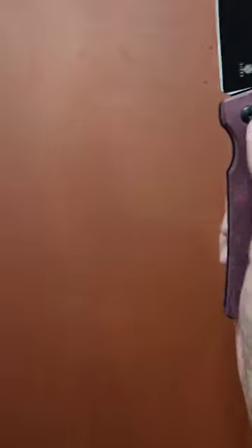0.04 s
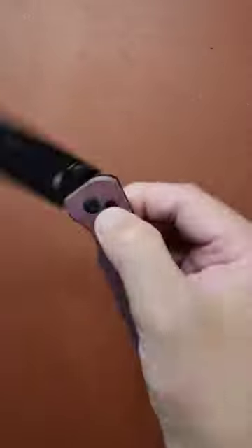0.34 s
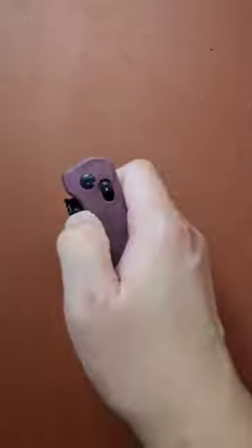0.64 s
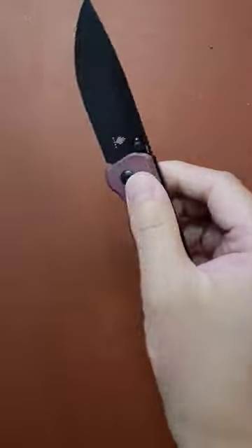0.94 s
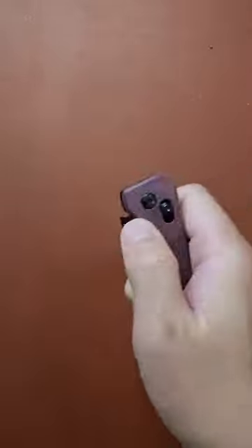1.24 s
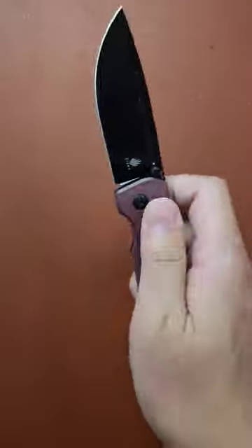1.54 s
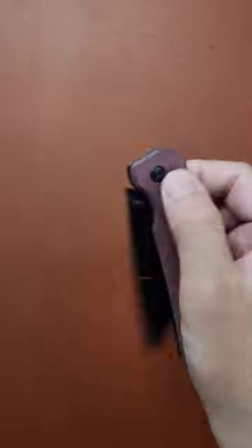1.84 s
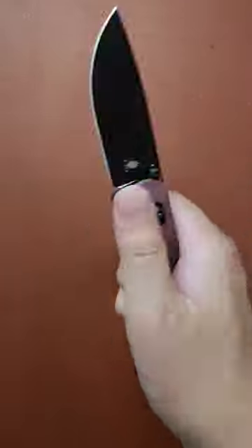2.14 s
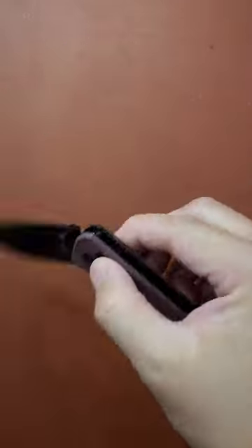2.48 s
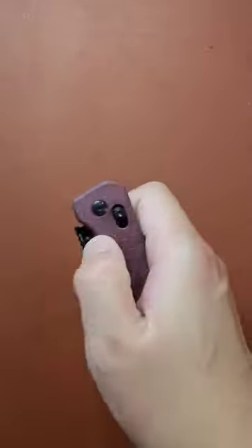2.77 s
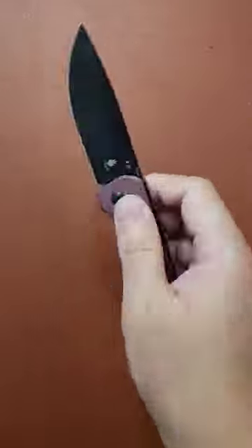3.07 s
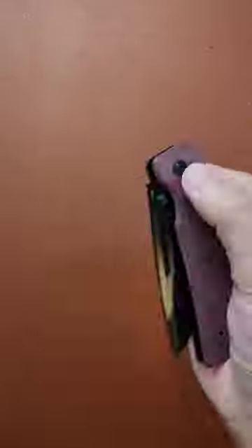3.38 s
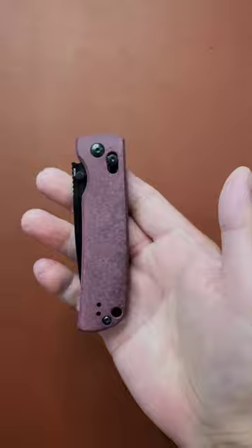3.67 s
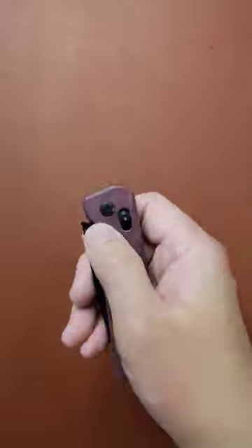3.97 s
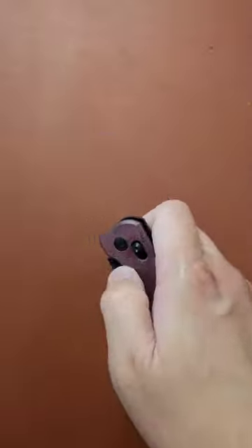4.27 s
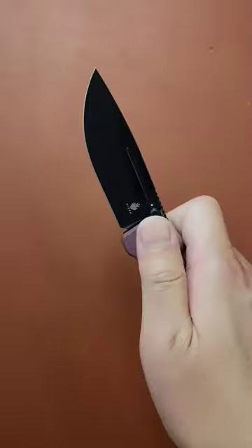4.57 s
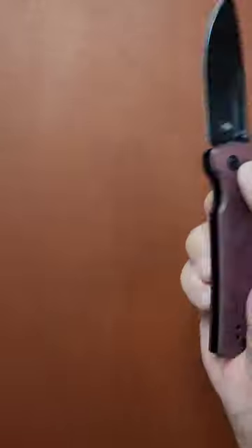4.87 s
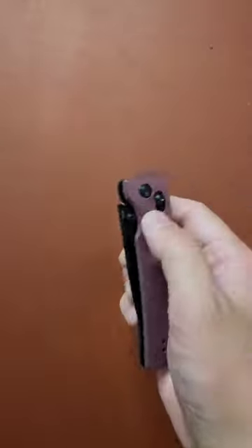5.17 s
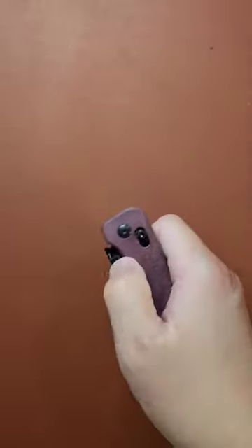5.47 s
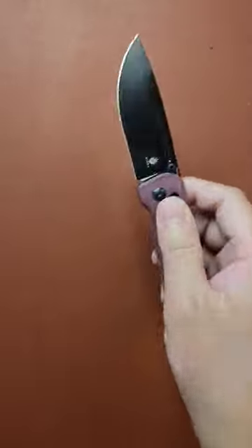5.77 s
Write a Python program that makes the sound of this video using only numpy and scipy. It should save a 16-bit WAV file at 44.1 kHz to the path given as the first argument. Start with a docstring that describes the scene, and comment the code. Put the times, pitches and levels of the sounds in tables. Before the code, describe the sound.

Close up in a small, dry room, a pocket knife clacks shut, then snaps open with a short steel ring. The pair repeats six times in all, with slightly longer gaps in the second half. Small lock and pivot ticks fall between the main clicks, and each snap carries a very short burst of hiss. Behind it all runs the soft, low hum of a fan.

```python
"""Playing with a folding knife

A knife is shut and flicked open six times, close to the microphone in a small, dry room.
The lock bar ticks. The blade drops into the handle with a clack, or swishes round its pivot,
snaps against its stop and rings. Each snap sits in a short swell of hiss, and fainter swells
come in between. A fan hums steadily underneath."""
import sys
import numpy as np
from scipy import signal
from scipy.fft import rfft, irfft
from scipy.io import wavfile
from scipy.ndimage import map_coordinates

SR = 44100
rng = np.random.default_rng(int(sys.argv[2]) if len(sys.argv) > 2 else 0)


def dump(signal):
    """Clip the signal to [-1, 1] and save it as 16-bit WAV at the path in sys.argv[1]."""
    limited = np.clip(np.atleast_2d(signal).T, -1, 1)
    pcm = np.round(limited * 32767).astype(np.int16)
    wavfile.write(sys.argv[1], SR, pcm)


N = 265482

# A noise's colour says how strong its low and high parts are against each other: f/Hz, level/dB
FAN_COLOUR = [(15, -19), (35, -16.5), (70, -6.5), (125, -1), (190, -3), (240, -5.5), (275, -16),
              (315, -10.5), (370, -21), (470, -27), (680, -23), (830, -23.5), (1150, -28.5), (1500, -31.5),
              (2500, -41.5), (4000, -52), (8000, -69.5)]
STEADY_HISS_COLOUR = [(1000, -1.5), (4000, -1), (9000, -6), (15000, -9)]
RUMBLE_COLOUR = [(15, -8.5), (35, -6.5), (70, -3.5), (130, 0), (280, -13), (450, -30), (1500, -50),
                 (4000, -88)]
SOFT_HISS_COLOUR = [(1200, -18.5), (2500, -6), (5000, 0), (8000, -2), (15000, -10)]
# the fan's tones: f/Hz, level/dB, wavering rate/Hz
FAN_TONES = [(132.9, -63.5, 7.1), (167.9, -58.5, 4.2), (227.7, -64, 5), (590, -87.5, 1.5), (888, -86, 6),
             (1075, -79, 2.7)]
# how the rumble dies away: t/s, level/dB
RUMBLE_FADE = [(0, -51), (.15, -50), (.4, -50.5), (.62, -48), (.72, -51.5), (.85, -70), (6.02, -70.5)]
# how alike the background is on the left and right: f/Hz, likeness (1 = the same)
ROOM_LIKENESS = [(60, 0.75), (150, 0.65), (380, 0.42), (950, -0.16), (2380, -0.25), (5980, -0.2),
                 (15000, 0.03)]
# faint swells of hiss between the clicks: t/s, level/dB, half width/s
HISS_SWELLS = [(0.136, -75, .025), (.245, -62.5, 0.018), (.303, -57, 0.022), (0.381, -65.5, 0.075),
               (.932, -61.5, 0.0087), (.999, -67.5, 0.034), (1.3, -64, 0.023), (2.599, -70, 0.018),
               (4.035, -65.5, 0.016), (4.098, -64, 0.035), (4.153, -63, .01), (4.216, -65, .015),
               (4.37, -79.5, .023), (5.421, -75.5, 0.058), (5.941, -69, 0.015)]
# the colour of each knife part, by name: f/Hz, level/dB
PART_COLOURS = {"open": [(260, -45), (450, -37), (882, -19.5), (1400, -31.5), (1850, -19), (3500, -10.5),
                (4000, -11.5), (4560, -8.5), (5600, -12.5), (7400, -3), (8400, -6), (9200, -10.5),
                (14800, -15), (16000, -37.5)], "shut": [(260, -48.5), (500, -29), (882, -16.5),
                (1300, -27.5), (2500, -8.5), (3500, -13), (4400, -4), (6150, -5.5), (7360, -6),
                (11000, -7.5), (13200, -4), (15300, -9), (16000, -20.5)], "lock": [(400, -35.5), (900, -23),
                (1700, -23), (2600, -17), (3700, -13.5), (4600, 3.5), (5750, -2.5), (7310, -4.5),
                (8450, -5), (9880, -7), (13400, -7), (15200, -14), (16000, -20)], "pivot": [(710, -37),
                (1500, -19.5), (2100, -9), (2790, 2.5), (3870, 0.5), (5020, -2), (6500, -10), (7410, -7.5),
                (9000, -9), (14000, -15.5), (16000, -30)], "stud": [(1200, -24), (2400, -22.5), (2900, 5.5),
                (3500, -19), (4600, -12.5), (7000, -22.5), (15000, -32.5)]}
# pitches that the handle boosts or weakens: f/Hz, width/Hz, lift/dB
HANDLE_RESONANCES = [(859.7, 65, 5), (1820, 130, 1), (2460, 840, 3), (3740, 930, -2.5), (5660, 710, 2),
                     (7370, 510, 5.5), (9100, 190, 1.5), (11370, 510, -7.5), (11600, 1100, 4.5),
                     (13400, 850, 3.5), (14500, 400, -4.5), (14750, 880, 6.5)]
# how each part answers a hit: time to fade by 60 dB/s, tilt/(dB per octave; more is brighter)
PART_RESPONSES = {"open": (.013, 0), "shut": (.014, 0.26), "lock": (0.013, -0.59), "pivot": (0.02, 0),
                  "stud": (.017, 1.5)}
# small ticks of the mechanism: t/s, level/dB, part
MECHANISM_TICKS = [(0.2319, -40, "lock"), (0.3314, -35.5, "lock"), (.423, -18.5, "lock"),
                   (.681, -60.5, "lock"), (0.752, -56.5, "pivot"), (0.787, -30, "lock"),
                   (1.414, -56.5, "stud"), (1.465, -54, "stud"), (1.8603, -25.5, "lock"),
                   (1.9351, -35, "lock"), (2.5731, -43.5, "lock"), (2.8784, -57.5, "stud"),
                   (2.9217, -59.5, "stud"), (2.972, -49, "stud"), (3.382, -45, "lock"),
                   (3.444, -51, "lock"), (4.0696, -50, "lock"), (5.0715, -40.5, "lock"),
                   (5.087, -43.5, "lock"), (5.328, -64, "stud"), (5.523, -63, "pivot"),
                   (5.608, -52, "pivot"), (5.634, -33, "pivot")]
# short swells of hiss around the lock's tick and the closing clack: main swell t/s, its level/dB,
# ring level/dB, early swell ahead by/s, its level/dB, lock swell ahead by/s, its level/dB,
# trailing hiss level/dB
CLOSING_SWELLS = [(.502, -28.5, -31, 0.029, -39, .072, -40, -64.5),
                  (1.231, -28.5, -49.5, .011, -30, 0.089, -34.5, -88),
                  (1.965, -28.5, -43.5, 0.031, -46.5, .106, -40, -74),
                  (2.644, -32.5, -44.5, 0.0065, -28, .11, -43, -63.5),
                  (3.503, -37.5, -49.5, 0.027, -30.5, 0.13, -50.5, -64),
                  (5.165, -30, -46, 0.026, -37, 0.1, -41.5, -76)]
# the closing blade hits and bounces: t/s, level/dB, left over right/dB, tilt/(dB per octave)
BLADE_CLACKS = [(0.4774, -8, 1.5, 1), (.5001, -18, 1, -1.5), (.5119, -25.5, 7, -2.5),
                (.5205, -30, 3.5, 3.5), (1.218, -23.5, 9, 10), (1.9644, -23, 13, 10),
                (1.974, -17.5, -1, 10), (2.6665, -23, 0, 1), (3.4668, -32, 0, 1.5), (3.476, -19.5, 1, 0),
                (3.4815, -26, 2, -2), (3.5067, -20.5, -0.5, 1.5), (5.1507, -14, -0.5, 0.5)]
# the blade flicks open: t/s at the stop, snap level/dB, left over right/dB, swell level/dB,
# ring level/dB, tilt/(dB per octave), swish ahead by/s, swish level/dB, trailing hiss level/dB
OPENINGS = [(0.8083, -23.5, -1, -24, -31.5, 0, .021, -42.5, -71.5),
            (1.5406, -13, -1, -30, -34, -0.5, 0.026, -38, -74.5),
            (2.2202, -12, -1.5, -24, -34, -0.3, .025, -40.5, -68),
            (3.0244, -18, -7.5, -25.5, -35.5, 0, 0.029, -40.5, -72.5),
            (4.6067, -12, 0.5, -30.5, -35, .5, 0.031, -48.5, -74.5),
            (5.661, -36, 4, -25.5, -35, -1.9, 0.018, -38, -70)]
# the open blade's ringing tones: f/Hz, level/dB, time to fade by 60 dB/s
BLADE_TONES = [(2790, -15.5, 0.1), (3520, -10, .15), (6520, -12, .12), (6750, -11, .13), (7320, -2.5, .16),
               (7700, -7, .16), (7560, -9, 0.29), (7740, -7, 0.15), (8360, -9.5, 0.14), (8380, -8.5, .17),
               (8540, -13, .15), (13170, -11, .11)]
# the thumb creaks on the blade's stud before a flick: t/s, level/dB, half width/s
THUMB_CREAKS = [(1.41, -69, .03), (2.14, -70, .021), (2.845, -75, .023)]

LEAD_S = .12  # every swell is placed this long before its peak
LEFT_LEAD_S = .0001  # the knife is nearer the left microphone


def amp(db):
    """Turn decibels into a number to multiply by."""
    return 10 ** (np.asarray(db) / 20)


def unit(x):
    """Scale a sound to an average strength (rms) of 1."""
    return x / np.sqrt(np.mean(x ** 2) + 1e-20)


def along(points, hz):
    """Read between a table's (frequency, value) points on a log scale."""
    freqs, values = np.transpose(points)
    return np.interp(np.log(hz + 1), np.log(freqs + 1), values)


def wobble(rate, size):
    """A smooth random curve through `rate` random points a second."""
    knots = int(size * rate / SR) + 4
    fine = signal.resample(rng.standard_normal(knots), knots * 8)
    return np.interp(np.arange(size) * rate / SR, np.linspace(0, knots, len(fine), endpoint=False), fine)


def noise(colour_db, alike, size, lead_s=0):
    """Stereo noise; colour and left-right likeness depend on frequency, and the left may come first."""
    hz = np.fft.rfftfreq(size, 1 / SR)
    spread = np.arccos(np.clip(alike(hz), -1, 1)) / 2 * np.ones_like(hz)
    spectra = rfft(rng.standard_normal((2, size))) * amp(colour_db(hz))
    mid, side = spectra * [np.cos(spread), np.sin(spread)]
    right_delay = np.exp(-2j * np.pi * hz * lead_s)
    return unit(irfft([mid + side, (mid - side) * right_delay], size))


def add(track, s, sound):
    """Mix a sound into the track, starting at s seconds."""
    start = round(s * SR)
    first, end = max(start, 0), min(start + sound.shape[1], N)
    track[:, first:end] += sound[:, first - start:end - start]


def swell(t, width_s, steep_db):
    """A rounded rise and fall in loudness around t = 0, with a sudden start."""
    onset = (1 + np.tanh(4 * (t / width_s + 2.31))) / 2
    return onset * amp(-steep_db * (np.hypot(1, t / width_s) - 1))


def ripple(hz, depth_db, spacing_hz):
    """Small random bumps and dips in a noise's colour."""
    heights = rng.standard_normal(2 ** 9)
    return depth_db * map_coordinates(heights, [hz / spacing_hz], mode="mirror")


def room_noise(colour):
    """Background noise, more alike on both sides in the bass than in the treble."""
    return noise(lambda hz: along(colour, hz), lambda hz: along(ROOM_LIKENESS, hz), N)


def fan():
    """A fan's rush of air and wavering hum, with a faint hiss behind them."""
    t = np.arange(N) / SR
    rush = amp(-56.6 + 1.3 * wobble(4.4, N)) * room_noise(FAN_COLOUR)
    hiss = amp(-85 + 1.5 * wobble(19, N)) * room_noise(STEADY_HISS_COLOUR)
    hum = np.zeros(N)
    for hz, db, waver_hz in FAN_TONES:
        strength = amp(db + 4 * wobble(5.5, N))
        hum += strength * np.sin(2 * np.pi * hz * t + 1.6 * wobble(waver_hz, N))
    return rush + hiss + hum


def rumble():
    """A low rumble that drops away within the first second."""
    fade_db = np.interp(np.arange(N) / SR, *np.transpose(RUMBLE_FADE))
    return amp(fade_db) * noise(lambda hz: along(RUMBLE_COLOUR, hz), lambda hz: .88, N)


def soft_hiss(db, width_s=.023):
    """A soft, faint swell of hiss."""
    def colour_db(hz):
        return along(SOFT_HISS_COLOUR, hz) + ripple(hz, depth_db=1.5, spacing_hz=200)
    t = np.arange(2 ** 14) / SR
    hiss = noise(colour_db, lambda hz: .1, len(t))
    return amp(db - 1) * hiss * swell(t - LEAD_S, width_s, steep_db=14)


def hiss_swells():
    """Faint swells of hiss come and go between the clicks."""
    out = np.zeros((2, N))
    for s, db, width_s in HISS_SWELLS:
        add(out, s - LEAD_S, soft_hiss(db, width_s))
    return out


def knife_noise(part, tilt_db, alike, size):
    """Noise in the colour of one part, shaped by the handle and a little differently by each grip."""
    def colour_db(hz):
        lift = sum(db / (1 + (2 * (hz - centre) / width) ** 2)
                   for centre, width, db in HANDLE_RESONANCES)
        tilt = tilt_db * np.log2(np.maximum(hz, 3000) / 7000)  # harder hits brighten only the treble
        grip = ripple(hz, depth_db=3.5, spacing_hz=109.92)
        return along(PART_COLOURS[part], hz) + lift + tilt + grip
    return noise(colour_db, lambda hz: alike, size, LEFT_LEAD_S)


def steel_hit(db, pan_db, tilt_db, part):
    """Steel meets steel: a millisecond or two of chatter that the hand stops at once."""
    t = np.arange(2 ** 11) / SR
    fade_s, part_tilt_db = PART_RESPONSES[part]
    chatter_s = .093 * fade_s  # parts that ring longer also chatter longer
    attack = 1 - np.exp(-t / (.24 * chatter_s))
    shape = attack * amp(-60 * np.maximum(t - chatter_s, 0) / fade_s)
    burst = shape * knife_noise(part, tilt_db + part_tilt_db, alike=.19, size=len(t))
    burst *= np.sqrt(np.mean(shape ** 2) / np.mean(burst ** 2))  # chance does not change its strength
    return amp(db - .45) * amp([[pan_db / 2], [-pan_db / 2]]) * burst


def ticks():
    """The slightly loose lock bar, pivot and thumb stud tick; the harder the tick, the brighter."""
    out = np.zeros((2, N))
    for s, db, part in MECHANISM_TICKS:
        add(out, s, steel_hit(db, pan_db=1.5, tilt_db=.19 * (db + 31), part=part))
    return out


def grainy_hiss(part, db, ring_db, width_s, tilt_db):
    """A short swell of grainy hiss around a click, then a brief ring."""
    t = np.arange(2 ** 13) / SR
    grain = amp(2.3 * wobble(600, len(t)))
    hiss = knife_noise(part, tilt_db, alike=.11, size=len(t)) * grain
    hiss *= amp(db - 1.5) * swell(t - LEAD_S, width_s, steep_db=14.5) * amp([[.4], [-.4]])
    ring = knife_noise(part, tilt_db - 2.5, alike=.1, size=len(t)) * amp(-60 * t / .18)
    if part == "open":  # only the open blade rings clearly
        ring += amp(-7.5) * blade_ring(t)
    ring *= amp(ring_db) * (1 - np.exp(-t / .002)) * amp([[1], [-1]])
    wait = round(LEAD_S * SR)  # the ring starts as the hiss peaks
    return np.pad(hiss, [(0, 0), (0, wait)]) + np.pad(ring, [(0, 0), (wait, 0)])


def closing():
    """The blade clacks into the handle; short swells of hiss surround the lock's tick and the clack."""
    out = np.zeros((2, N))
    for s, swell_db, ring_db, early_s, early_db, lock_s, lock_db, trail_db in CLOSING_SWELLS:
        start = s - LEAD_S
        add(out, start - lock_s, grainy_hiss("lock", lock_db, lock_db - 11.5, width_s=.0102, tilt_db=-2))
        add(out, start - early_s, grainy_hiss("shut", early_db, early_db - 25, width_s=.01, tilt_db=1))
        add(out, start, grainy_hiss("shut", swell_db, ring_db, width_s=.0115, tilt_db=.94))
        add(out, start + .125, soft_hiss(trail_db))
    for s, db, pan_db, tilt_db in BLADE_CLACKS:
        add(out, s, steel_hit(db, pan_db, tilt_db, "shut"))
    return out


def opening():
    """The blade swishes round its pivot, snaps against its stop in a swell of hiss and rings."""
    out = np.zeros((2, N))
    for s, snap_db, pan_db, swell_db, ring_db, tilt_db, swish_s, swish_db, trail_db in OPENINGS:
        start = s - LEAD_S
        swish = grainy_hiss("pivot", swish_db, swish_db - 23.5, width_s=.0112, tilt_db=.7)
        add(out, start - swish_s, swish)
        add(out, start - .0012, grainy_hiss("open", swell_db, ring_db, width_s=.0099, tilt_db=tilt_db))
        add(out, s, steel_hit(snap_db, pan_db, tilt_db, "open"))
        add(out, start + .17, soft_hiss(trail_db))
    return out


def blade_ring(t):
    """The struck blade's fading tones, at new strengths for each blow and each microphone."""
    hz, db, fade_s = np.transpose(BLADE_TONES)[:, :, None]
    per_side_and_tone = (2, len(BLADE_TONES), 1)
    strength = amp(db + 2.5 * rng.standard_normal(per_side_and_tone))
    phase = rng.uniform(0, 2 * np.pi, per_side_and_tone) + .6 * wobble(120, len(t))
    return np.sum(strength * amp(-60 * t / fade_s) * np.sin(2 * np.pi * hz * t + phase), axis=1)


def thumb_creaks():
    """The thumb sticks and slips on the blade's stud."""
    out, t = np.zeros((2, N)), np.arange(2 ** 14) / SR
    for s, db, width_s in THUMB_CREAKS:
        stud = knife_noise("stud", tilt_db=.5, alike=.27, size=len(t))
        slips = unit(stud * amp(4.5 * wobble(250, len(t))))
        add(out, s - LEAD_S, amp(db) * slips * swell(t - LEAD_S, width_s, steep_db=6))
    return out


def scene():
    """The knife and the swells of hiss, over the fan and the rumble."""
    return opening() + closing() + ticks() + hiss_swells() + thumb_creaks() + fan() + rumble()


def record(dry):
    """Cut away the very highest treble."""
    hz, top_hz = np.fft.rfftfreq(N, 1 / SR), 15900
    return irfft(rfft(dry) / np.sqrt(1 + (hz / top_hz) ** 160), N)


dry = scene()
out = record(dry)
dump(out)
```